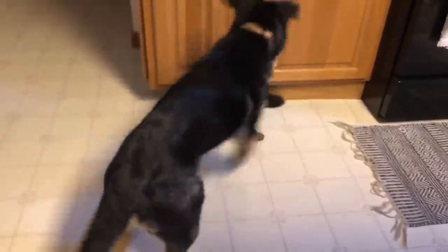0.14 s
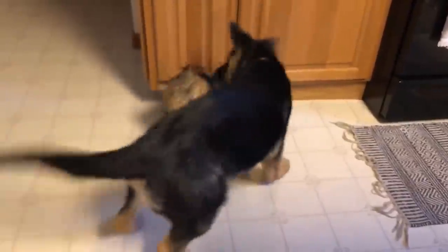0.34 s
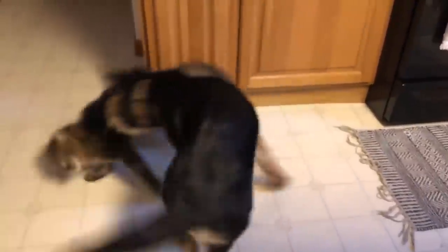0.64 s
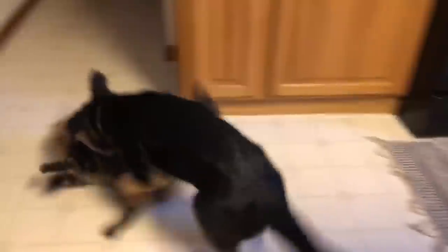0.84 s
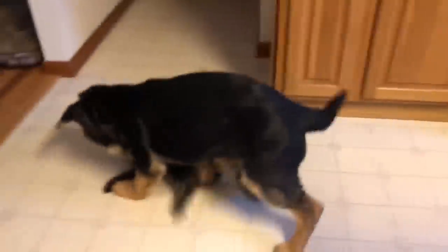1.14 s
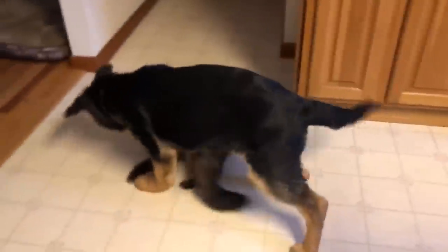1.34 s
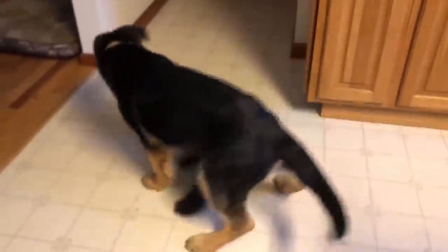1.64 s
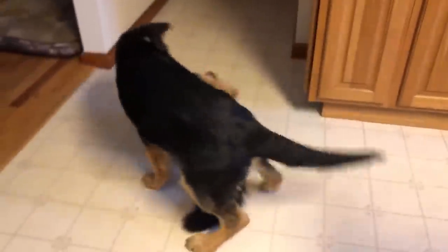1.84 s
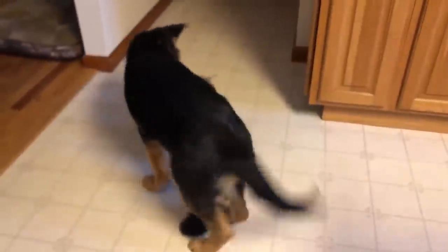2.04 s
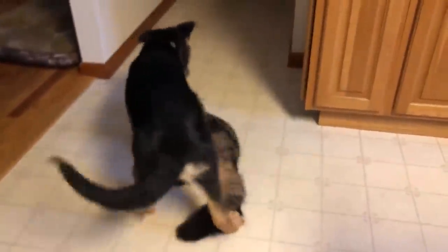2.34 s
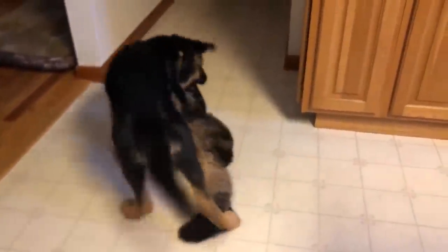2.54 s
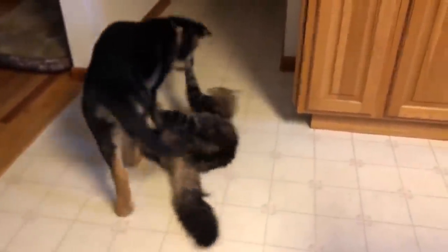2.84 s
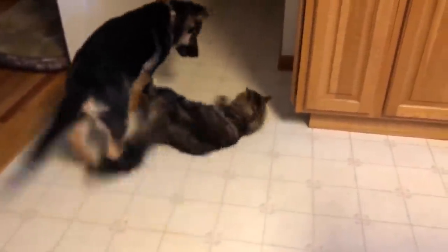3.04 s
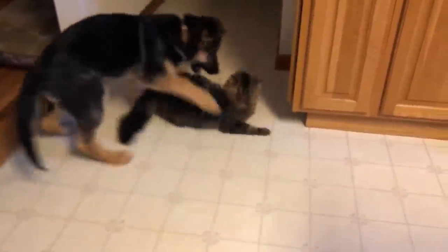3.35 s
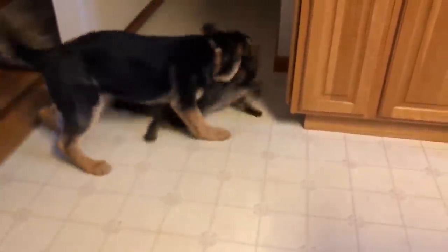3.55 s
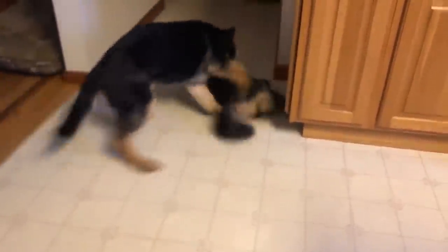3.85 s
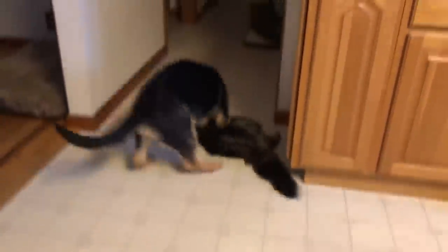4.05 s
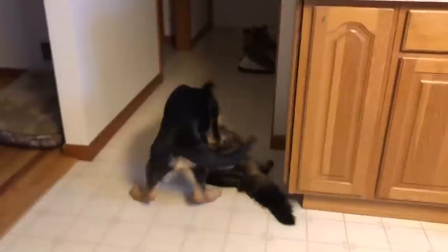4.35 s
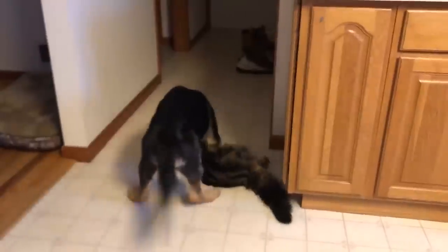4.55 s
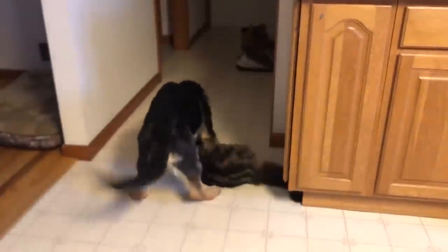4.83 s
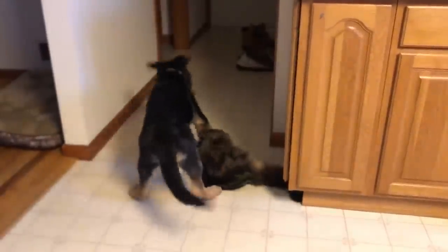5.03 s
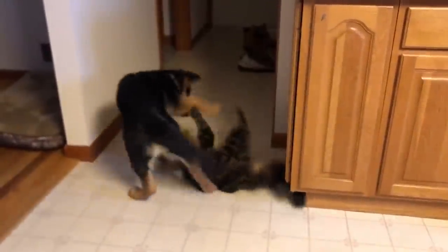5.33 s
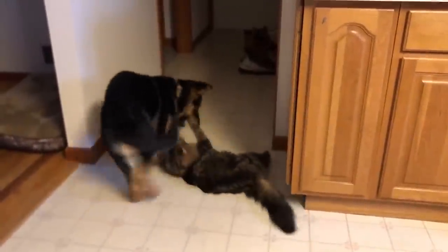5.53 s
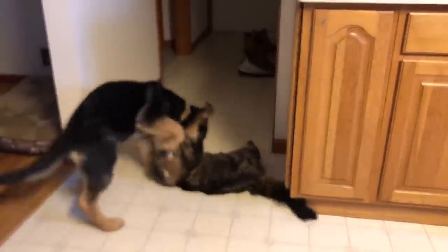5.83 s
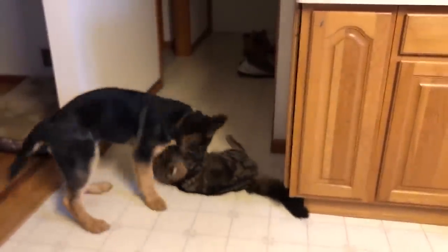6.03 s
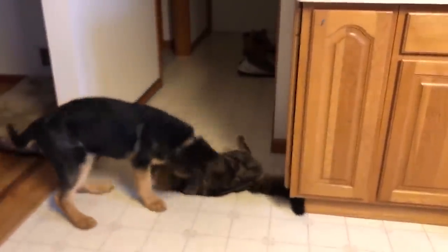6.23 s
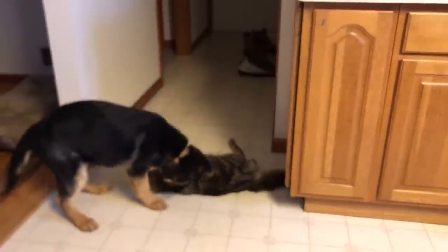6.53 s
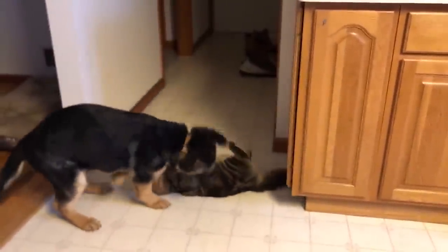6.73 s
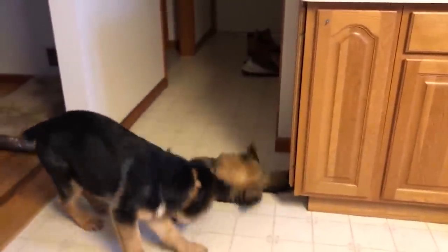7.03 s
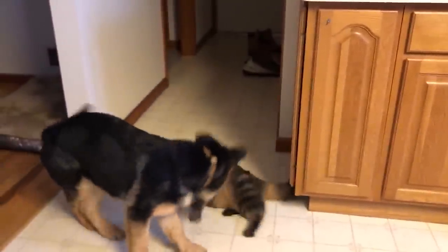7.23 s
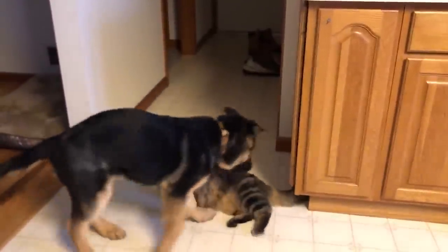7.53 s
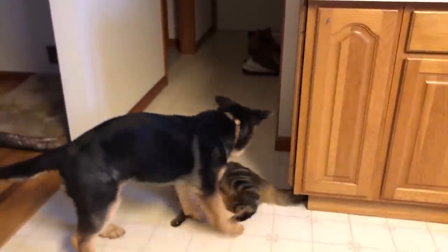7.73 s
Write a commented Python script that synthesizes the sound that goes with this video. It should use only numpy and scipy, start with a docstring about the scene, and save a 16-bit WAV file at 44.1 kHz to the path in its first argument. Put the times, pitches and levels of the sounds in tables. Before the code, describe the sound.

A puppy and a cat wrestle on a hard kitchen floor, with dull thumps, clicking claws, rubbing fur and a few faint snuffles.

```python
"""A puppy and a cat wrestle on a hard kitchen floor laid over wooden joists.
From the start paws and bodies thump the floor, hardest at 0.9 s; claws click and skid, fur rubs.
From 2.7 s the puppy snuffles now and then. A second bout peaks at 3.5-3.9 s, a lull follows,
and lighter scuffling runs from 5.6 s to the end.
Throughout, the bare kitchen rings after every contact, over a faint appliance hum."""
import sys
import numpy as np
from scipy import signal
from scipy.fft import rfft, irfft, next_fast_len
from scipy.io import wavfile
from scipy.ndimage import uniform_filter1d, map_coordinates

SR = 44100
rng = np.random.default_rng(int(sys.argv[2]) if len(sys.argv) > 2 else 0)


def file_out(sig):
    """Save sig as 16-bit WAV at sys.argv[1]."""
    # one column per channel
    cols = np.atleast_2d(sig).T
    # limit, then scale
    lim = np.clip(cols, -1, 1)
    pcm = np.round(lim * 32767).astype(np.int16)
    wavfile.write(sys.argv[1], SR, pcm)


N = 347508
TIME = np.arange(N) / SR
TOP_HZ, HIT_SIZE = 16050, 32768
HIT_TIME, HIT_HZ = np.arange(HIT_SIZE) / SR, np.fft.rfftfreq(HIT_SIZE, 1 / SR)

# paws and bodies landing: (time [s], level [dB], knock [dB], floor spot resonance [Hz], nails [dB])
LANDINGS = [(0.167, -31.5, -27, 233, -48), (.301, -22, -11.5, 176, -30), (.443, -32, -10, 290, -38),
            (.607, -22.5, -6, 158, -28.5), (0.677, -43, 1, 150, -33), (0.772, -22.5, -17.5, 257, -32.5),
            (.825, -28.5, -15, 240, -75), (.908, -8, -9.5, 225, -20), (.985, -25.5, -3, 225, -70),
            (1.048, -21, -2, 200, -36), (1.205, -39, -26, 150, -39.5), (1.739, -25.5, -11, 155, -40),
            (1.802, -39, -19, 141, -56), (2.044, -38, -12.5, 194, -59), (2.222, -33, -14.5, 288, -58),
            (2.829, -25, -11, 155, -40.5), (2.916, -29, -13.5, 202, -42.5), (3.119, -35.5, -35, 145, -67),
            (3.215, -28.5, -19, 228, -63), (3.494, -18.5, -10, 194, -26), (3.562, -28, -18, 223, -70),
            (3.664, -25, -12.5, 302, -34), (3.728, -23.5, -16, 265, -70), (3.82, -19, -9.5, 185, -70),
            (3.876, -23.5, -14, 194, -30.5), (4.043, -36.5, -1.5, 172, -45), (4.187, -33, -8, 214, -70),
            (4.441, -41, 1.5, 297, -60), (5.585, -23.5, -12.5, 525, -77), (5.717, -32.5, -11, 180, -43),
            (5.782, -36.5, -36, 217, -74), (6.076, -25, -14, 370, -44.5), (6.136, -33, -11, 205, -78),
            (6.326, -39.5, -15, 146, -70), (7.062, -29.5, -23, 154, -70), (7.308, -42, -4.5, 426, -63),
            (7.498, -27.5, -11.5, 222, -39.5), (7.822, -29.5, -13.5, 238, -41.5)]


def thumps(ring_share=0.82, bend_s=0.01782, spot_db=7, direct_db=-4.5, room_db=-10):
    """Each landing bends the floor: the knock arrives first, the slow, deep boom after it."""
    # floor resonances: (frequency [Hz], width [Hz], level [dB])
    boards = [(48.4, 4.4, 1), (84, 40, -8), (108, 13, -15.5), (152.3, 14.8, 2), (205.4, 24.7, 3.5),
              (238.4, 15.3, -1), (291.6, 13.4, -1.5), (345.4, 20, -4), (406.4, 15.3, -3.5),
              (476.5, 47, -19.5), (522, 63, -11.5), (601, 3.1, -10), (778, 5.3, -3)]
    # padded blow: (frequency [Hz], level [dB])
    pad = [(25, -52), (45, 4.5), (90, 10.5), (200, 2), (500, 0), (750, -12), (1200, -18.5), (2000, -32),
           (5000, -71)]
    modes = sum(amp(db) / np.hypot(1, 2 * (HIT_HZ - hz) / width) ** 2 for hz, width, db in boards)
    resonance = (modes / modes.max() + 0.15) ** ring_share
    delay_s = bend_s / (1 + (HIT_HZ / 230) ** 2)  # low bending waves travel slowest
    bending = np.exp(-2j * np.pi * np.cumsum(delay_s) * HIT_HZ[1])
    fade = np.clip((.6 - HIT_TIME) * 10, 0, 1)
    track = np.zeros(N)
    for s, db, knock_db, spot_hz, *_ in list(LANDINGS) + pats():
        boom_db = -1.5 - 11.5 * np.log2(spot_hz / 200)  # stiffer, higher spots boom less
        contact_db = along([(80, boom_db), (170, 0), (280, 0), (520, knock_db + 13.5)], HIT_HZ)
        favour_db = spot_db / (1 + ((HIT_HZ - spot_hz) / 35) ** 2)
        floor = causal(resonance * amp(along(pad, HIT_HZ) + contact_db + favour_db))
        scatter = burst(life_s=0.033) + amp(room_db) * room_tail()
        paths = evened(amp(direct_db) + rfft(scatter), width_hz=43)
        blow = fade * irfft(paths * bending * floor)
        add(track, s, amp(db) * 10 * blow / np.linalg.norm(blow))
    return track


def pats(per_s=2.6, over_effort_db=24.5, knock_db=-29, centre_hz=159):
    """Light random steps, heavier with effort: rows like LANDINGS, without nails."""
    steps = []
    for when, soft, spot in rng.random((round(per_s * N / SR), 3)):
        s = when * N / SR
        db = effort_db(s) + over_effort_db - 6 * soft
        steps.append((s, db, knock_db, centre_hz * 2 ** (spot - .5)))
    return steps


def claws(catch_s=.003):
    """A nail bites, then catches again as it scrapes on; the hard walls answer brightly."""
    # claw click: (frequency [Hz], level [dB])
    nail = [(150, -37), (600, 0.5), (1500, -5.5), (3000, -2), (5500, 3), (8000, 0), (12000, -2.5),
            (16000, -5)]
    # wall return: (frequency [Hz], gain [dB])
    walls = [(1000, 2.5), (5500, 6.5), (8000, 6.5), (11000, -1.5), (16000, 3)]
    track = np.zeros(N)
    for s, db, low_db, body_db, edge_db, room_db, scrape_s in nail_contacts():
        bite = burst(scrape_s) * (1 - np.exp(-HIT_TIME / (0.2 * scrape_s)))
        add(bite, catch_s * rng.uniform(.3, 1.3), .7 * burst(life_s=.0006))
        bite *= 1.66 / np.linalg.norm(bite)
        tilt = [(900, low_db + 25.5), (2000, body_db + 25.5), (5000, 0), (6500, 0),
                (10000, edge_db + 12.5)]
        # each nail and spot of floor has its own short resonances
        ring_db = 2.8 * map_coordinates(rng.standard_normal(100), [HIT_HZ / 260], mode="mirror")
        colour = amp(along(nail, HIT_HZ) + along(tilt, HIT_HZ) + ring_db)
        colour /= np.sqrt(np.mean(colour[HIT_HZ < TOP_HZ] ** 2))
        # the walls gather sound from all directions, evening out those resonances
        echo = rfft(room_tail()) * amp(room_db + along(walls, HIT_HZ) - .65 * ring_db)
        click = irfft((rfft(bite) + echo) * causal(colour))
        add(track, s, amp(db) * 2.94 * click)
    return track


def nail_contacts(click_s=.002, skid_s=.011, lead_s=.002, low_db=-8.5, body_db=-13, edge_db=-5.5):
    """Single clicks, and skids just before each pad lands: rows like clicks, plus scrape decay [s]."""
    # single claws: (time [s], level [dB], low toe tap [dB], body [dB], edge [dB], room [dB])
    clicks = [(0.4429, -22.5, -16.5, -15.5, -12, -3.5), (0.8098, -16, -39, -37, -5.5, -4),
              (0.8954, -23.5, -29, -24, -17, -5), (1.11, -39.5, -48, -34, 0, 2.5),
              (1.167, -43.5, -15, -20, -14.5, 0), (1.5, -35, -26.5, -9, -13.5, -4),
              (3.085, -33, -21.5, -15, -18, 0), (3.096, -37, -30, -14, 11, -13),
              (3.29, -36, -48, -25, -5.5, 2), (3.7173, -22, -26, -18, -6, -5.5),
              (3.7992, -22.5, -28, -38, -9, -4), (4.043, -37.5, 7, -14, -24, -6),
              (4.1244, -26, -24.5, -26.5, -14.5, 3.5), (5.1663, -51.5, -11.5, -13, -7, 3.5),
              (5.449, -43.5, -10, -14, -18, -6), (6.083, -38.5, -21, -16, -7, -4.5),
              (7.0674, -36.5, -28, -23, -8, -9), (7.553, -39, -1.5, -10, -18, -1)]
    contacts = [(*click, click_s) for click in clicks]
    for s, *_, db in LANDINGS:
        room_db = -11 - 0.29 * db  # faint nails are hidden ones, heard more through the room
        contacts.append((s - lead_s, db, low_db, body_db, edge_db, room_db, skid_s))
    return contacts


def rubbing(swell_db=2, quick_s=0.041, full_weight_db=-54.5, snags_per_s=45, room_db=-9):
    """Coats brush in grainy swells with the effort; quick sweeps are brighter, weight adds dull drag."""
    # tail or flank sweeps: (middle [s], half length [s], level [dB])
    swishes = [(0.67, 0.055, -55), (1.393, 0.047, -55.5), (1.652, .015, -54.5), (1.882, 0.028, -59.5),
               (2.114, 0.045, -65.5), (2.172, 0.024, -60), (2.485, 0.082, -65), (2.945, 0.065, -64),
               (3.24, 0.024, -54.5), (3.51, 0.09, -54), (3.86, 0.095, -48.5), (4.641, 0.062, -69.5),
               (4.996, .05, -71), (5.378, 0.033, -62.5), (5.736, 0.025, -60.5), (6.282, 0.093, -65.5),
               (7.032, 0.024, -50.5), (7.1, 0.066, -64), (7.275, 0.026, -57), (7.673, 0.025, -59.5)]
    # brushing coats: (frequency [Hz], level [dB])
    fur = [(900, -50), (2200, -5), (4000, -5), (6500, -2.5), (9500, -2), (12500, -4), (16000, -6)]
    # light flicks: (frequency [Hz], level [dB])
    flick = [(2000, -20), (6000, -8.5), (10000, -6), (14000, -4.5), (16000, -2)]
    # dragged weight: (frequency [Hz], level [dB])
    drag = [(100, -74), (250, 14), (600, 4.5), (1200, 1.5), (2200, -3.5), (4500, -38), (9000, -43)]
    level_db = effort_db(TIME) + swell_db * wobble(10)
    quick_power, slow_power = np.zeros(N), np.zeros(N)
    for s, half_s, db in swishes:
        power = (amp(db) * np.exp(-np.minimum(((TIME - s) / half_s) ** 2, 20))) ** 2
        lightness = 1 / (1 + (half_s / quick_s) ** 4)
        quick_power += lightness * power
        slow_power += (1 - lightness) * power
    brush_power = amp(level_db - 1) ** 2 + slow_power
    drag_db = level_db + 1 + 0.61 * (level_db - full_weight_db)
    drag_power = amp(drag_db) ** 2 + amp(-5) ** 2 * slow_power
    snagged = rng.random(N) < snags_per_s / SR  # nail tips and hairs catching
    snags = snagged * amp(3.5 * np.clip(rng.standard_normal(N), -2, 2))
    ticks = unit(signal.fftconvolve(snags, burst(life_s=0.00066))[:N])
    hairs = coloured(unit(grains(810)) + amp(-8.5) * ticks, fur)
    tips = coloured(grains(540), flick)
    pads = coloured(grains(250), drag)
    rub = patchy(hairs) * np.sqrt(brush_power) + tips * np.sqrt(quick_power) + pads * np.sqrt(drag_power)
    return rub + amp(room_db) * signal.fftconvolve(rub, room_tail())[:N]


def effort_db(s):
    """How hard the two wrestle at s seconds."""
    # effort as rubbing fur: (time [s], level [dB])
    effort = [(0.0, -133), (0.33, -64.5), (0.48, -55), (0.83, -58), (1.6, -69), (2.08, -89), (2.3, -69.5),
              (2.85, -74), (2.98, -66), (3.73, -61.5), (4.08, -59), (4.32, -74), (4.65, -94), (5.66, -70.5),
              (6.14, -63.5), (6.39, -81), (6.8, -71), (7.13, -59.5), (7.27, -70), (7.88, -73)]
    return np.interp(s, *np.transpose(effort))


def patchy(x, depth_db=2, width_hz=1800, life_s=0.079):
    """A rub's colour shifts as other tufts of fur come into contact."""
    hz, t, z = signal.stft(x, SR, nperseg=256)
    knots = rng.standard_normal((64, 512))
    field = map_coordinates(knots, np.meshgrid(hz / width_hz, t / life_s, indexing="ij"), mode="mirror")
    return unit(signal.istft(z * amp(depth_db * field), SR, nperseg=256)[1][:N])


def shaded(x, corner_hz=11000):
    """Bodies and distance screen off the shortest waves."""
    # top treble as the animals move and turn: (time [s], gain [dB])
    shade = [(0, -5), (1.3, -3), (2.2, -4), (3.1, -4), (3.55, -11), (4.3, -11), (6.1, -5), (6.97, -13),
             (7.04, 0.5), (7.88, 1)]
    treble = filtered(x, lambda hz: 1 - 1 / (1 + (hz / corner_hz) ** 12))
    return x + (amp(np.interp(TIME, *np.transpose(shade))) - 1) * treble


def snuffles():
    """Short swells of noise, each in one resonance."""
    # snuffles, squeaky scuffs, thin rustles: (time [s], length [s], pitch [Hz], width [Hz], level [dB])
    puffs = [(2.66, .12, 4200, 2400, -77), (3.858, .035, 1380, 300, -43.5), (4.04, .035, 1000, 600, -56),
             (4.44, .025, 1200, 1300, -63), (6.625, .13, 2900, 900, -71.5), (6.96, .28, 5900, 1400, -65),
             (7.03, .22, 2450, 400, -68), (7.62, .2, 2400, 400, -76)]
    track = np.zeros(N)
    for s, length_s, hz, width_hz, db in puffs:
        noise = rfft(rng.standard_normal(HIT_SIZE))
        hiss = unit(irfft(noise / (1 + ((HIT_HZ - hz) / width_hz * 2) ** 2)))
        swell = np.sin(np.pi * np.clip(HIT_TIME / length_s, 0, 1))
        add(track, s, amp(db) * hiss * swell)
    return track


def room_tail(rise_s=0.00088):
    """A new diffuse answer of the kitchen, each frequency dying at its own speed; energy 1."""
    # reverberation: (frequency [Hz], T60 [s])
    kitchen = [(60, 0.81), (200, 0.86), (600, 0.61), (2000, 0.59), (5000, 0.55), (8000, 0.29),
               (14000, 0.27)]
    hz, t, z = signal.stft(rng.standard_normal(HIT_SIZE), SR, nperseg=256)
    decay = amp(-60 * t / along(kitchen, hz)[:, None])
    tail = signal.istft(z * decay, SR, nperseg=256)[1][:HIT_SIZE]
    tail *= 1 - np.exp(-HIT_TIME / rise_s)
    return tail / np.linalg.norm(tail)


def hum_and_air(air_db=-62):
    """An appliance hums, slightly unsteady, over the still air of the kitchen."""
    # appliance tones: (frequency [Hz], level [dB])
    tones = [(53.8, -69), (118.8, -66.5), (161.5, -74.5), (306.8, -74.5)]
    # quiet kitchen: (frequency [Hz], level [dB])
    air = [(25, -17), (40, -5), (56, 8), (75, -20), (98, -5.5), (125, -10), (170, -4.5), (317, -8),
           (545, -15.5), (960, -17), (1200, -23), (2050, -28.5), (2400, -29.5), (2850, -32), (7100, -35.5),
           (15500, -40)]
    hum = np.zeros(N)
    for hz, db in tones:
        peak = amp(db + 1.5 * wobble(5)) * np.sqrt(2)
        hum += peak * np.sin(2 * np.pi * hz * TIME + .7 * wobble(7))
    return hum + amp(air_db) * coloured(rng.standard_normal(N), air)


def amp(db):
    """Decibels to gain."""
    return 10 ** (np.asarray(db) / 20)


def unit(x):
    """Scale to rms 1."""
    return x / np.sqrt(np.mean(x ** 2) + 1e-20)


def along(points, hz):
    """Read (frequency [Hz], value) points on a log axis."""
    f, v = np.transpose(points)
    return np.interp(np.log(hz + 1), np.log(f + 1), v)


def wobble(knots_per_s):
    """A smooth random curve."""
    return map_coordinates(rng.standard_normal(int(N * knots_per_s / SR) + 4), [TIME * knots_per_s])


def grains(per_s, depth_db=2):
    """Noise with a fast flutter in level."""
    return rng.standard_normal(N) * amp(depth_db * wobble(per_s))


def burst(life_s):
    """A dying spray of tiny impacts; energy 1."""
    spray = rng.standard_normal(HIT_SIZE) * np.exp(-HIT_TIME / life_s)
    return spray / np.linalg.norm(spray)


def filtered(x, response):
    """Apply the gain response(hz) to x."""
    size = next_fast_len(N + SR // 2)
    return irfft(rfft(x, size) * response(np.fft.rfftfreq(size, 1 / SR)), size)[:N]


def coloured(x, spectrum):
    """x shaped by (frequency [Hz], level [dB]) points; rms 1."""
    return unit(filtered(x, lambda hz: amp(along(spectrum, hz))))


def causal(gain):
    """Minimum-phase response with this gain: it rings only after the blow."""
    cepstrum = irfft(np.log(np.maximum(gain, 1e-6)))
    cepstrum[1:HIT_SIZE // 2] *= 2
    cepstrum[HIT_SIZE // 2 + 1:] = 0
    return np.exp(rfft(cepstrum))


def evened(spectrum, width_hz):
    """Level a spectrum's broad trend, keeping its fine peaks and dips."""
    power = uniform_filter1d(np.abs(spectrum) ** 2, max(int(width_hz / HIT_HZ[1]), 1))
    return spectrum / np.sqrt(np.abs(power) + 1e-12)


def add(track, s, sound):
    """Mix a sound into the track at s seconds."""
    start = max(round(s * SR), 0)
    part = track[start:start + len(sound)]
    part += sound[:len(part)]


def scene():
    """The tussle and the room, mono."""
    return (thumps() + shaded(claws() + rubbing()) + snuffles() + hum_and_air())[None]


def record(dry, low_hz=42):
    """The microphone sheds the deepest bass and keeps nothing above its band limit."""
    return filtered(dry[0], lambda hz: (1 - 1 / (1 + (hz / low_hz) ** 8)) * (hz < TOP_HZ))[None]


dry = scene()
out = record(dry)
file_out(out)
```